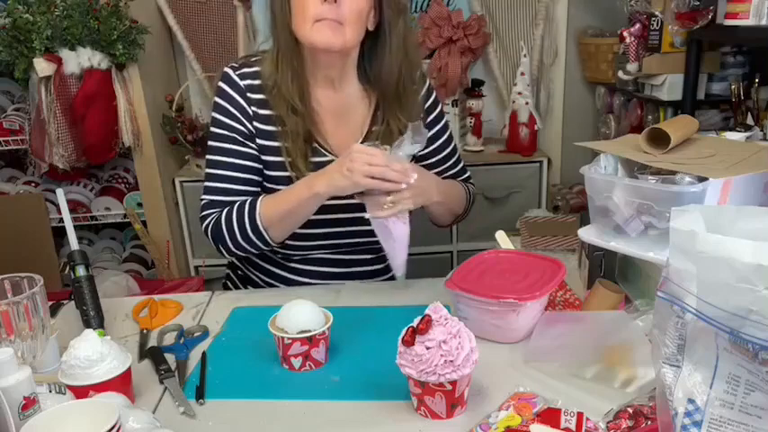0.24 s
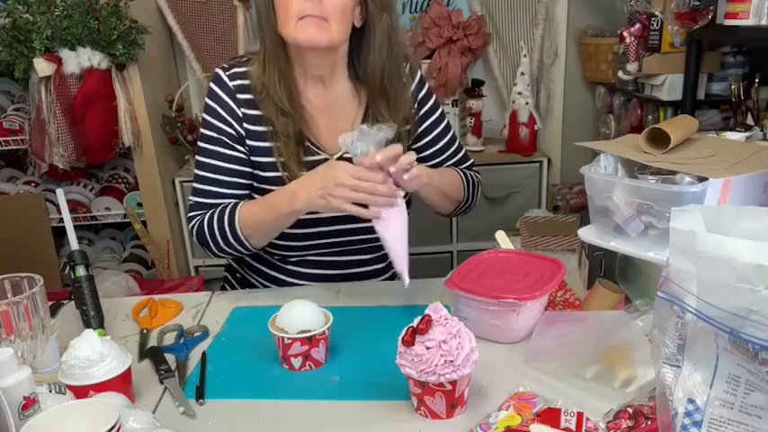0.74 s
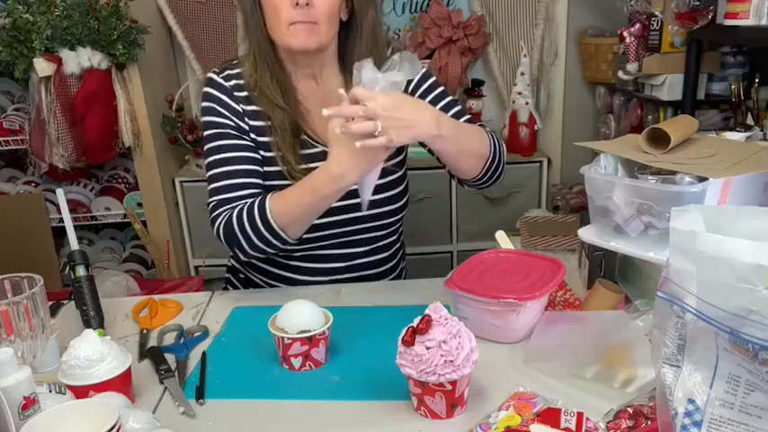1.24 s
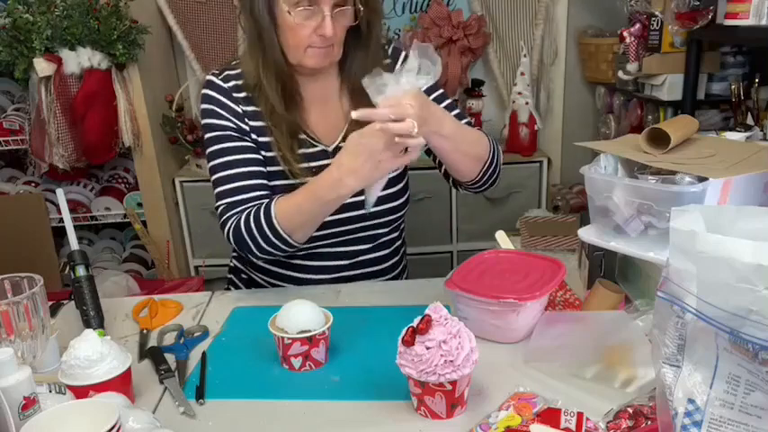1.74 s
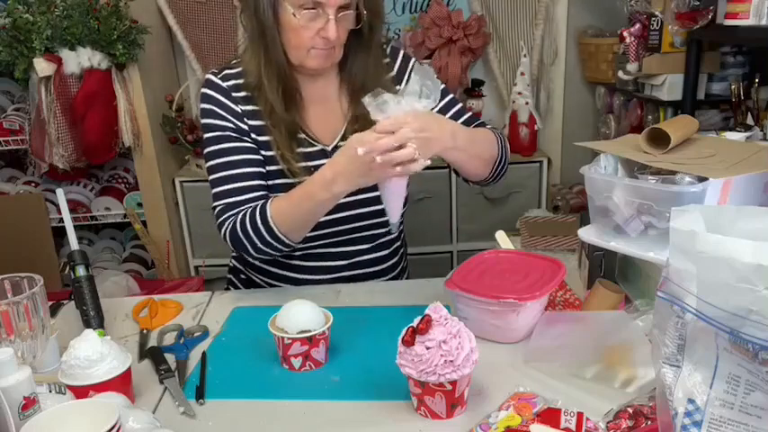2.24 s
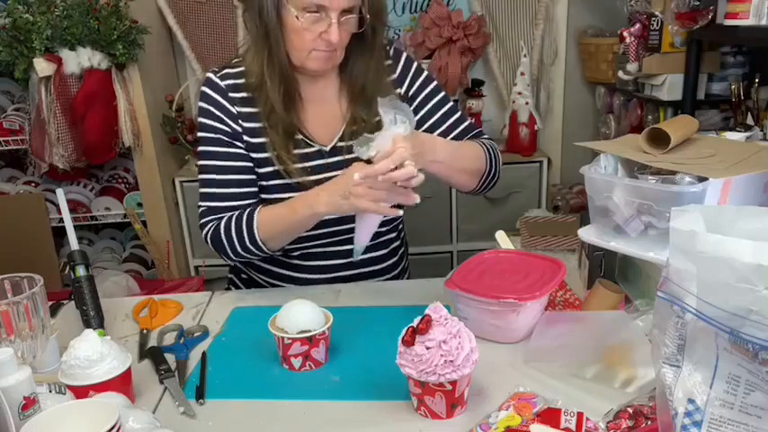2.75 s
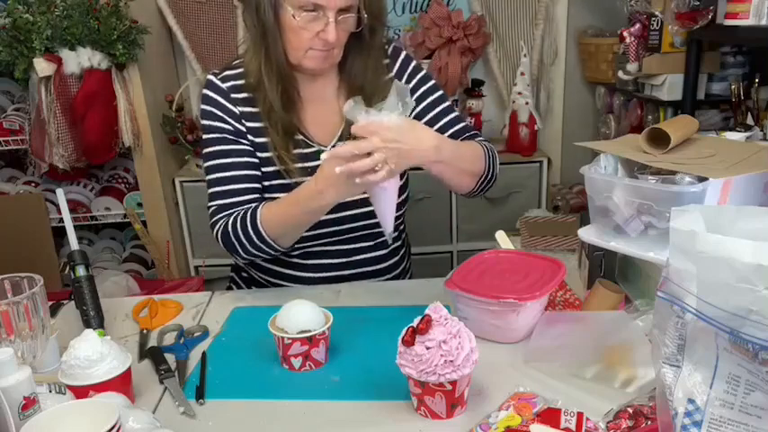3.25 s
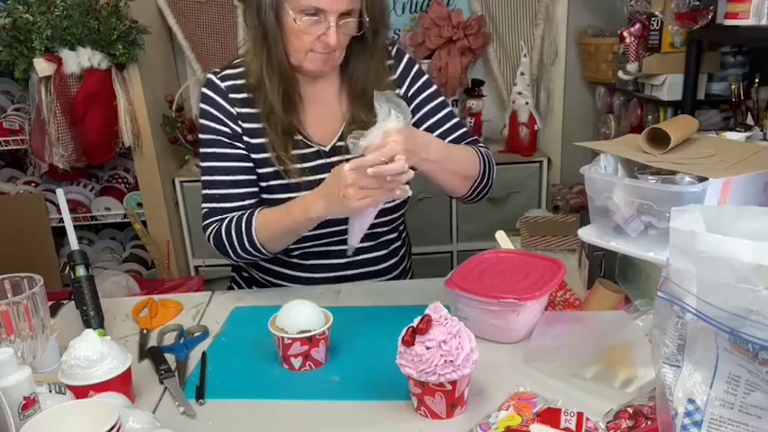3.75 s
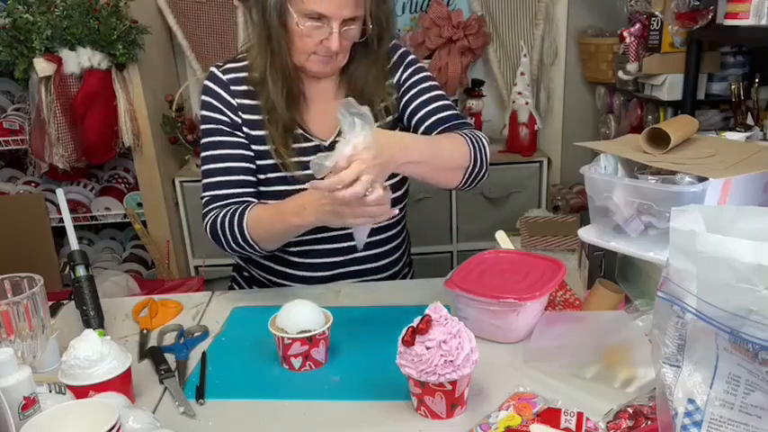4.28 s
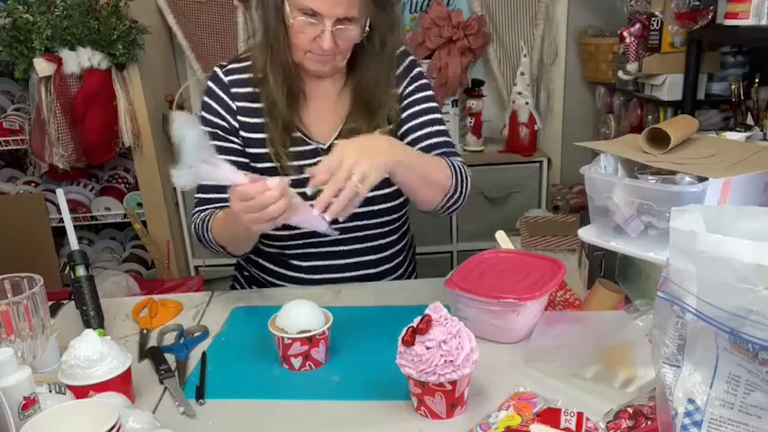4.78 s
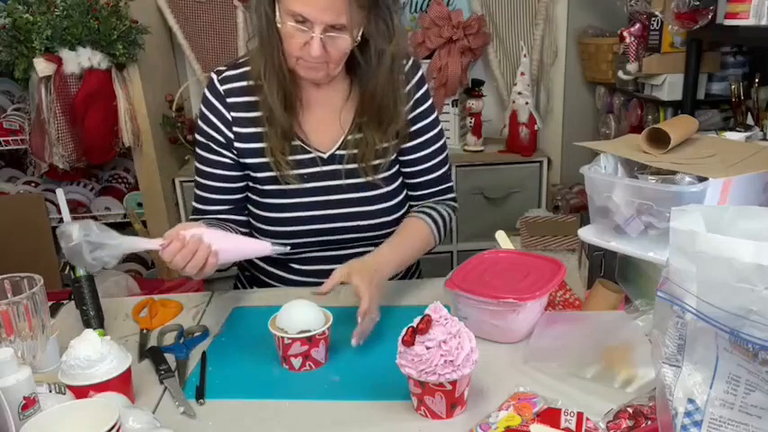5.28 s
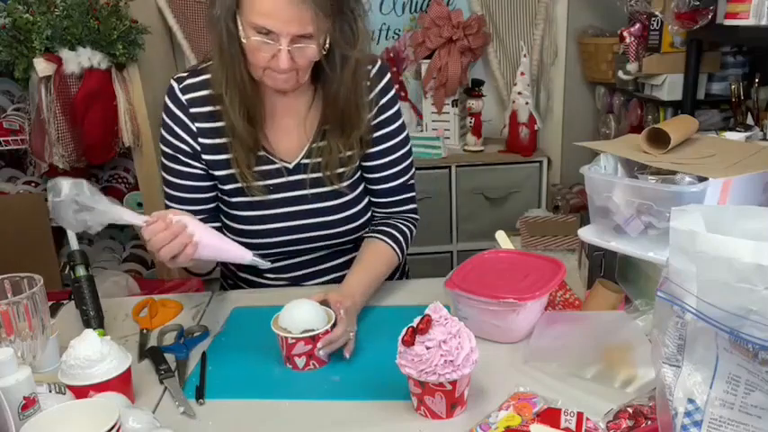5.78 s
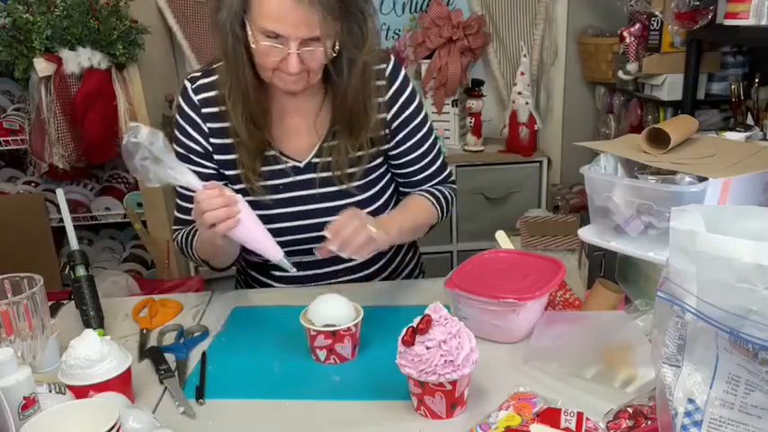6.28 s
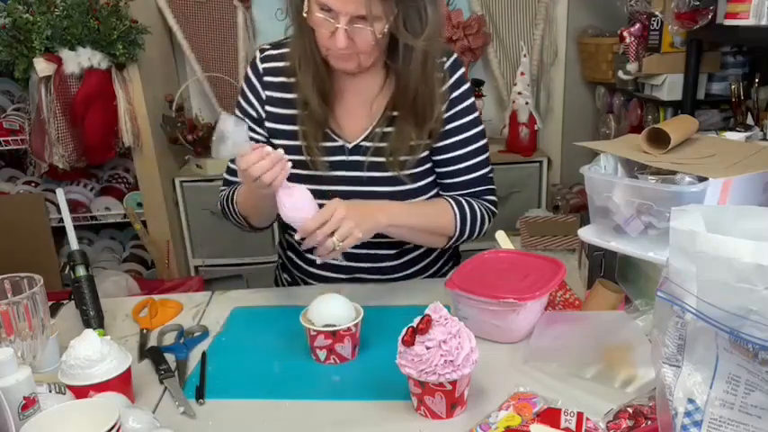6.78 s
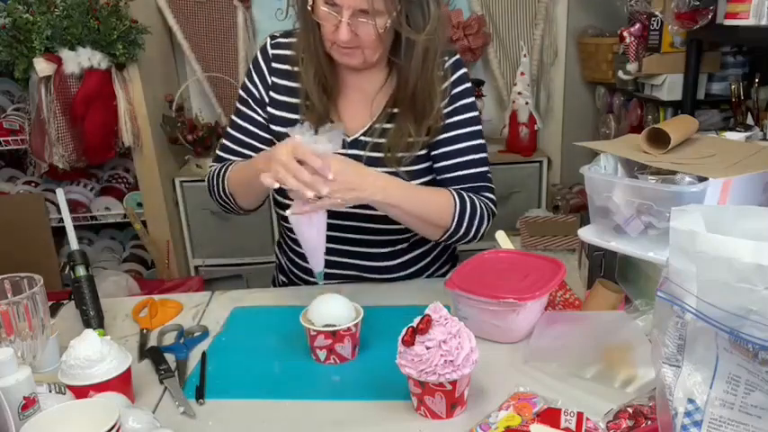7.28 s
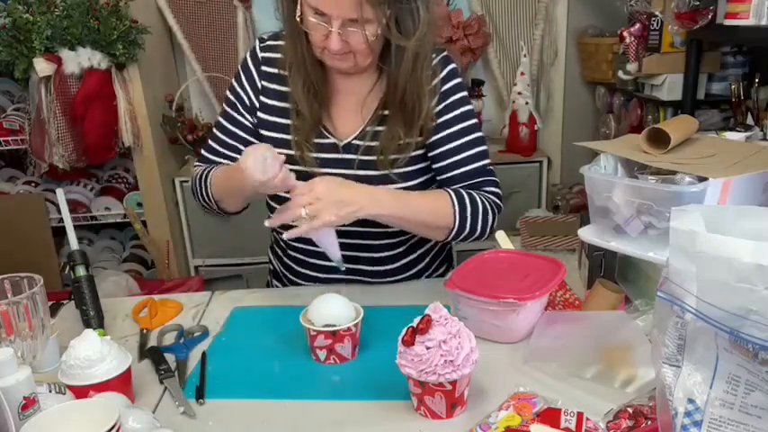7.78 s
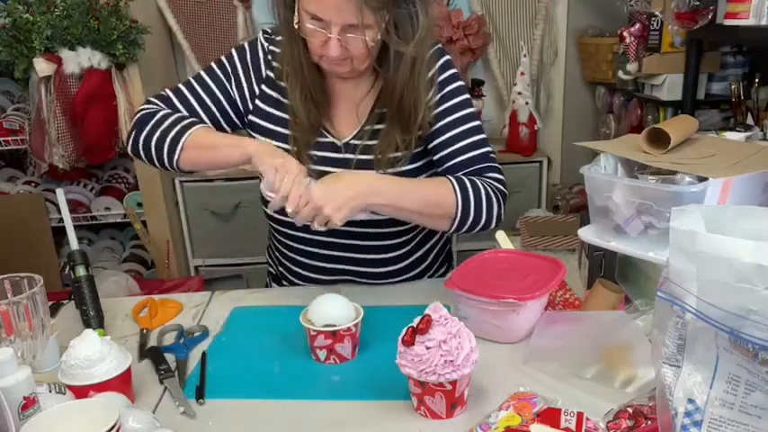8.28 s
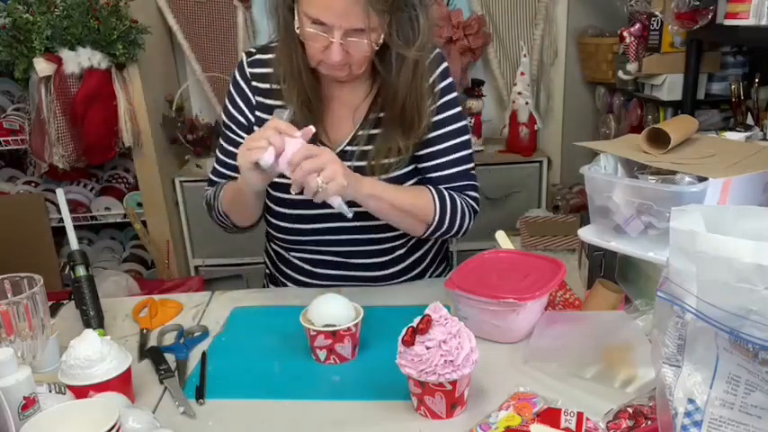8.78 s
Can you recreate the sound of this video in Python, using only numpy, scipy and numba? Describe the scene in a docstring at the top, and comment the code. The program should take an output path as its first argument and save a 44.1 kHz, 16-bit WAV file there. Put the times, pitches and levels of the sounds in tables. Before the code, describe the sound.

Close to one microphone in a small, dry, cluttered room, a thin plastic piping bag is twisted and squeezed. From 0 to 0.7 s it is loudest: sharp pops, dense swarms of bright snapping creases and several hollow knocks as large folds flip. From 0.8 to 3 s the crinkling comes in uneven, gradually weaker bursts with crisp single snaps; from 3 to 5 s it thins to lighter ticks, with a brief rustle near 4.7 s. Around 5 to 5.9 s only sparse faint clicks remain. At 5.9 to 6.2 s a paper cup slides roughly over a mat, then lands with a short rattling tap at 6.3 s. Light ticks return from 6.5 s, building to loud crackle and knocks at about 7.4 to 8.6 s, then easing slightly but still snapping to the end at 9 s. Low room rumble, faint hiss and a wavering two-tone motor hum sit underneath, the hum sinking away.

```python
"""A thin plastic piping bag is twisted and squeezed by hand in a small, cluttered craft room, near one microphone.
It opens with sharp pops, dense swarms of snapping creases and hollow knocks, and slowly calms over some five seconds.
Near 6 s a paper cup slides over a mat (rough noise through wall resonances) and is set down (a rattling ring);
then the bag builds up to loud crackle again. Noise bursts ringing small panels of film make the snaps.
Throughout, room rumble and hiss lie under a distant motor, two wavering tones that sink away towards the end."""
import sys
import numpy as np
from scipy import signal
from scipy.fft import rfft, irfft
from scipy.io import wavfile
from scipy.ndimage import uniform_filter1d
from numba import njit

SR = 44100
rng = np.random.default_rng(int(sys.argv[2]) if len(sys.argv) > 2 else 0)


def dump_mix(stems):
    """Bounce the given channels to the path in sys.argv[1] as a 16-bit WAV at rate SR."""
    frames = np.atleast_2d(stems).T  # one column per channel
    limited = np.clip(frames, -1, 1)  # hard clip at full scale
    pcm = np.round(limited * 32767).astype(np.int16)
    wavfile.write(sys.argv[1], SR, pcm)


N = 398223  # length in samples
STEP = 64  # gesture gains are worked out once every so many samples

# Tone of the room's rumble and hiss. Each row: frequency in Hz, density in dB per Hz (relative).
AIR_TONE = [(18, -70), (30, -44.5), (52, -12.5), (75, -6.5), (170, -9.5), (330, -11), (560, -19),
            (800, -21.5), (1300, -26.5), (2000, -35), (3500, -34), (7000, -38), (16000, -43.5)]
AIR_DB = -62
# Two lines of motor hum. Each row: time in s, lower line in dB, upper line in dB (both before HUM_TRIM_DB).
HUM_LEVELS = [(0.0, -57, -53), (1.5, -61, -59.5), (2.2, -54.5, -57), (2.59, -56.5, -57), (2.76, -64.5, -71),
              (4.6, -64, -63), (6.44, -67.5, -75.5), (9.03, -84, -94)]
# Centre frequencies of the lower and the upper hum line in Hz.
HUM_HZ = 72.2, 108.2
HUM_TRIM_DB, HUM_WAVER_DB = -5.0, 2.5
ROOM_T60_S, ROOM_DB = 0.13, -10  # decay below the treble; energy of the tail against the direct sound
TREBLE_T60_RATIO = 0.68

# Resonances of the sliding cup. Each row: centre in Hz, width in Hz, gain in dB (relative).
CUP_BODY = [(177, 93, -6), (366, 240, -7), (850, 160, 0.5), (1280, 860, -7.5), (2320, 620, -3.5),
            (3800, 1500, -6), (6300, 4900, -10.5)]
# Set-downs of the cup. Each row: start in s, peak in dB.
CUP_TAPS = [(6.331, -32.5)]
# Modes of the knocked cup. Each row: frequency in Hz, strength in dB (relative), 60 dB decay time in s.
CUP_MODES = [(440, 6, .05), (596, 3.5, 0.05), (786, 10, .04), (994, 8, 0.035), (1410, 4, 0.022),
             (2010, 1.5, 0.027), (2600, -2, 0.017)]
# Pushes of the cup over the mat. Each row: time of full level in s, hold in s, level in dB.
CUP_PUSHES = [(5.905, 0.018, -47), (5.964, .015, -47), (6.045, .16, -38.5)]
PUSH_RISE_DB_PER_S, PUSH_SAG_DB_PER_S, PUSH_STOP_DB_PER_S = 300, 47, 505

# Hollow knocks of the filled bag as a large fold flips. Each row: start in s, drive in dB, ring in Hz.
FOLD_FLIPS = [(0.052, -26, 570), (0.161, -26, 600), (0.187, -29, 606), (0.274, -21.5, 579),
              (0.409, -28.5, 570), (0.713, -37, 581), (1.128, -31, 545), (1.678, -36, 538),
              (2.689, -32, 579), (2.739, -31, 447), (7.463, -27, 498), (7.98, -31, 447), (8.156, -37, 560),
              (8.386, -27, 617), (8.464, -38, 603), (8.525, -31, 546), (8.572, -34.5, 536),
              (8.752, -33, 563)]
# Single snaps that stand out from the crackle, loud and soft. Each row: start in s, drive in dB (before trims),
# ring in Hz, treble in dB against the drive.
SINGLE_SNAPS = [(0.056, -3, 1600, -12.5), (0.087, -12, 1610, -22), (0.156, -17, 2150, -1),
                (0.187, -8.5, 1460, -10), (0.431, -13.5, 2830, -4), (0.551, -11.5, 1900, -9),
                (0.599, -11.5, 1670, -5.5), (0.645, -18, 2970, 3), (0.715, -28, 2500, -15),
                (0.738, -27, 2500, -15), (0.806, -16.5, 1860, -11), (0.863, -18, 4560, -15),
                (0.937, -20.5, 1700, -2), (0.965, -26, 3090, -17), (1.049, -21, 3730, -7),
                (1.086, -9.5, 2860, -15), (1.201, -17, 2780, -28), (1.381, -17.5, 2700, -33),
                (1.525, -17, 3000, -9), (1.636, -14.5, 1850, -16), (1.653, -11.5, 2380, -15),
                (1.677, -13.5, 1630, -5.5), (1.797, -13.5, 5950, -14), (1.891, -11.5, 3270, -16),
                (1.916, -13, 1060, -23), (2.123, -27, 4180, -15), (2.222, -19, 3080, -11),
                (2.243, -19.5, 4270, -29), (2.339, -21, 3220, -14), (2.405, -18.5, 3600, -3),
                (2.479, -18, 4270, -13), (2.493, -10.5, 4600, -10), (2.694, -14, 3030, -23),
                (2.739, -9.5, 3120, -17), (2.867, -9.5, 5200, -14), (3.013, -21.5, 3800, -13),
                (3.054, -22, 4770, -10), (3.089, -22, 2800, -24), (3.209, -26, 4700, -3.5),
                (3.34, -23, 3080, -24), (3.416, -22.5, 4630, -2.5), (3.514, -12, 4560, -8),
                (3.566, -12.5, 3580, -21), (3.871, -19.5, 2980, -0.5), (4.033, -17, 3800, -18),
                (4.086, -22, 5600, -20), (4.14, -27, 3020, -22), (4.221, -30.5, 3070, -18),
                (4.295, -21, 1600, -31), (4.317, -28, 1600, -20), (4.477, -33.5, 3340, -15),
                (4.624, -27, 2710, -17), (4.818, -25.5, 1370, -29), (5.186, -32.5, 3560, -35),
                (5.466, -20.5, 4000, -18.5), (5.495, -35.5, 1780, -30), (5.657, -42.5, 4090, -29),
                (5.758, -24.5, 3180, -22), (5.764, -27.5, 4970, -25), (6.26, -50, 3700, -23),
                (6.293, -44, 3380, -35), (6.487, -25, 1310, -18), (6.677, -29, 3330, -23),
                (6.743, -21, 3100, -12), (6.847, -20, 2920, -4), (6.888, -17, 5640, -12),
                (7.041, -29.5, 3320, -13), (7.2, -20.5, 2160, -16), (7.35, -22, 4110, -23),
                (7.401, -15, 3890, -24), (7.538, -5, 4700, -17), (7.608, -13.5, 4740, -11),
                (7.944, -9.5, 6850, -16), (8.017, -10.5, 3420, -24), (8.112, -20, 2070, -20),
                (8.137, -13.5, 3100, -4), (8.373, -13, 2400, -15), (8.471, -19.5, 2030, -17),
                (8.523, -14.5, 4530, -14), (8.573, -13, 2540, -16), (8.656, -19, 3360, -10),
                (8.753, -12, 2100, -22), (8.789, -19, 3000, -10), (8.855, -14.5, 3380, -12.5),
                (8.901, -20.5, 4400, -13), (8.938, -19.5, 5300, -11), (8.977, -18, 6630, -5.5)]
# Tone of the crackling film. Each row: frequency in Hz, density in dB per Hz (relative).
FILM_TONE = [(88, -52.5), (150, -20.5), (291, -16), (578, -9), (805, -13), (1170, -3), (1600, -2.5),
             (2450, 1), (4580, 1), (13400, -12.5), (16000, -16)]
# Twists and squeezes. Each row: time of full grip in s, hold in s, crackle in dB (before CRACKLE_TRIM_DB),
# large folds in dB against the crackle.
GRIPS = [(0.0, 0.097, -33.5, -4), (0.152, 0.069, -32.5, -2.5), (0.256, 0.065, -25, -7),
         (0.429, 0.041, -26.5, -5.5), (0.512, 0.15, -31.5, -8), (0.809, 0.16, -44.5, -10),
         (1.039, 0.11, -37, -3.5), (1.208, 0.39, -39, -9), (1.643, 0.045, -34.5, -7),
         (1.72, 0.11, -40, -13), (1.901, 0.084, -31.5, -10.5), (2.158, 0.11, -47.5, -5.5),
         (2.367, 0.064, -39, -10), (2.502, .2, -37.5, -8), (2.711, 0.14, -36.5, -10),
         (3.02, .36, -49.5, -14), (3.434, .05, -40.5, -13), (3.504, 0.063, -38, -12),
         (3.63, 0.19, -50.5, -7), (3.828, 0.038, -45.5, -5.5), (4.055, .13, -54, -12.5),
         (4.204, .14, -50, -12), (4.41, .08, -58.5, -18), (4.639, .03, -43, -10),
         (4.683, 0.018, -35.5, -6.5), (4.828, 0.019, -64, -11), (5.186, 0.031, -70.5, -1),
         (5.498, 0.052, -68, -9), (5.644, 0.038, -63.5, -8), (5.762, .06, -64.5, -2),
         (6.261, 0.13, -67.5, 4.5), (6.477, 0.118, -65.5, -1), (6.703, 0.09, -57.5, -3),
         (6.841, .05, -43.5, -8.5), (6.943, .22, -56.5, -7.5), (7.204, .14, -49.5, -10.5),
         (7.377, 0.059, -41, -8.5), (7.44, 0.028, -29, -11), (7.501, .11, -34, -12),
         (7.679, 0.07, -39, -18), (7.83, 0.21, -34, -14), (8.152, 0.047, -30, -12),
         (8.259, 0.14, -39, -8.5), (8.443, 0.23, -48, -9), (8.739, .05, -47.5, -7),
         (8.819, .21, -46.5, -16)]
CRACKLE_TRIM_DB = 1.0
RISE_DB_PER_S, FALL_DB_PER_S = 317.5, 239.5  # how fast a grip tightens and lets go
REST_DB, REST_FOLDS_DB = -86, -3  # the film barely creeps between grips
# fine creases fall silent under a light touch
FINE_DB, SOFT_BELOW_DB, DULL_DB_PER_DB = -2.5, -53.5, 0.5
TOP_HZ = 15850  # upper edge of the sound


def undb(db):
    """Decibels to gain."""
    return 10 ** (np.asarray(db) / 20)


def level(x, db):
    """Scale x to an RMS level in dB."""
    return x * undb(db) / np.sqrt(np.mean(x ** 2))


def curves(table):
    """Columns of a table joined by straight lines, one value a sample."""
    s, *columns = np.transpose(table)
    return [np.interp(np.arange(N) / SR, s, c) for c in columns]


def colour(x, points):
    """Shape the spectrum by (Hz, dB) points, joined over log frequency."""
    hz, db = np.transpose(points)
    f = np.maximum(np.arange(N // 2 + 1) * SR / N, 1)
    return irfft(rfft(x) * undb(np.interp(np.log(f), np.log(hz), db)), N)


def band(x, hz, width):
    """Resonance with gain 1 at its centre."""
    return signal.lfilter(*signal.iirpeak(hz, hz / width, SR), x)


def cut_below(x, order, hz):
    """High-pass filter."""
    return signal.sosfilt(signal.butter(order, hz, "high", fs=SR, output="sos"), x)


def shelves(x):
    """Bass, middle and treble parts that sum to x."""
    low = signal.sosfiltfilt(signal.butter(2, 1000, fs=SR, output="sos"), x)
    high = signal.sosfiltfilt(signal.butter(2, 7500, "high", fs=SR, output="sos"), x)
    return low, x - low - high, high


def gestures(start, hold, db, rise, fall, sag=0.):
    """Gain of each gesture, one row each: a rise to the start, a sagging hold, a fall; slopes in dB per s."""
    t = np.arange(0, N, STEP) / SR - np.array(start)[:, None]
    hold = np.array(hold)[:, None]
    slope_db = rise * np.minimum(t, 0) - sag * np.clip(t, 0, hold) - fall * np.maximum(t - hold, 0)
    return undb(np.array(db)[:, None] + slope_db)


def per_sample(x):
    """Stretch a gesture curve to one value a sample."""
    return np.repeat(x, STEP)[:N]


@njit
def bursts(noise, start, size, hz, tau, rise, q, broad):
    """Each buckle is a quick swell and decay of noise; part of it rings the small panel around the crease."""
    out = np.zeros(len(noise))
    for e in range(len(start)):
        # state-variable band-pass, tuned to the panel
        g, k = np.tan(np.pi * hz[e] / SR), 1 / q
        band_state, low_state = 0., 0.
        fall, fast = np.exp(-1 / (tau[e] * SR)), np.exp(-1 / (rise * SR))
        # the envelope is a slow decay minus a fast one
        slow_env, fast_env = size[e], size[e]
        for i in range(start[e], min(start[e] + int(7 * tau[e] * SR) + 100, len(noise))):
            x = (slow_env - fast_env) * noise[(i + 997 * e) % len(noise)]
            v = (band_state + g * (x - low_state)) / (1 + g * (g + k))
            band_state, low_state = 2 * v - band_state, low_state + 2 * g * v
            slow_env, fast_env = slow_env * fall, fast_env * fast
            out[i] += broad * x + v * np.sqrt(k / g)
    return out


def background():
    """Rumble and hiss of the room as coloured noise, and two motor lines that waver in pitch and level."""
    t = np.arange(N) / SR
    drift = np.cumsum(rng.standard_normal((2, N)), axis=1) * 0.011  # phase wander in radians
    waver_db = HUM_WAVER_DB * level(uniform_filter1d(rng.standard_normal(N), SR // 8), 0)
    hum = 0
    for db, hz, wander in zip(curves(HUM_LEVELS), HUM_HZ, drift):
        gain = np.sqrt(2) * undb(db + HUM_TRIM_DB + waver_db)
        hum = hum + gain * np.sin(2 * np.pi * hz * t + wander)
    return hum + level(colour(rng.standard_normal(N), AIR_TONE), AIR_DB)


def room(near, count=8):
    """Table and shelves send back a short dense tail; the hands keep moving, so its pattern keeps changing."""
    t, out = np.arange(SR // 3) / SR, 0
    place = np.repeat(rng.integers(0, count, N // 1500 + 1), 1500)[:N]
    gap = np.zeros(int(.003 * SR))
    for k in range(count):
        low, mid, high = shelves(rng.standard_normal(len(t)))
        tail = (low + mid) * 1000 ** (-t / ROOM_T60_S) + high * 1000 ** (-t / (TREBLE_T60_RATIO * ROOM_T60_S))
        tail = np.concatenate([gap, undb(ROOM_DB) * tail / np.sqrt(np.sum(tail ** 2))])
        here = uniform_filter1d(1. * (place == k), 200)  # soft switch between places
        out = out + signal.oaconvolve(near * here, tail)[:N]
    return out


def cup_slide():
    """Rough friction of the rim on the mat rings the paper wall."""
    pushes = gestures(*np.transpose(CUP_PUSHES), PUSH_RISE_DB_PER_S, PUSH_STOP_DB_PER_S, PUSH_SAG_DB_PER_S)
    push = uniform_filter1d(per_sample(np.sqrt(np.sum(pushes ** 2, axis=0))), STEP)
    grit = rng.standard_normal(N) * undb(20 * uniform_filter1d(rng.standard_normal(N), 60))
    # the soft mat dulls the finest grit
    dull = signal.sosfilt(signal.butter(4, 7500, fs=SR, output="sos"), grit)
    grit = undb(-17.5) * grit + dull
    wall = sum(undb(db) * band(grit, hz, width) for hz, width, db in CUP_BODY)
    return push * level(wall, 0)


def cup_taps():
    """The cup knocks down unevenly: a rattling blow excites the decaying modes of its wall."""
    out, t = np.zeros(N), np.arange(SR // 4) / SR
    ring = 0
    for k, (hz, db, t60) in enumerate(CUP_MODES):
        ring = ring + undb(db) * (-1) ** k * np.sin(2 * np.pi * hz * t) * 1000 ** (-t / t60)
    # the rim does not land at once: the blow is a rattle of a few ms
    rattle = rng.standard_normal(len(t)) * np.exp(-t / 0.0094) * (1 - np.exp(-t / 0.0014))
    ring = signal.fftconvolve(ring, rattle)[:len(t)]
    ring = cut_below(ring, 2, 300)  # a light cup has no bass
    for s, peak_db in CUP_TAPS:
        out[int(s * SR):int(s * SR) + len(t)] += ring * undb(peak_db) / abs(ring).max()
    return out


def flips(tau_s=0.0056, rise_s=0.0011, q=4.0):
    """A large fold flips over and the air in the bag gives a short hollow knock."""
    s, db, hz = np.transpose(FOLD_FLIPS)
    start, tau = (s * SR).astype(np.int64), tau_s + 0 * s
    return bursts(rng.standard_normal(N), start, undb(db), np.clip(hz, 300, 900), tau, rise_s, q, 0.)


def handling():
    """Crackle level, share of large folds and share of fine creases, in dB, from all grips together."""
    start, hold, db, folds_db = np.transpose(GRIPS)
    power = gestures(start, hold, db, RISE_DB_PER_S, FALL_DB_PER_S) ** 2
    total = power.sum(axis=0) + undb(REST_DB) ** 2
    folds = undb(folds_db) ** 2 @ power + undb(REST_DB + REST_FOLDS_DB) ** 2
    db = uniform_filter1d(per_sample(10 * np.log10(total)), STEP)
    folds_db = per_sample(10 * np.log10(folds / total))
    fine_db = FINE_DB + DULL_DB_PER_DB * np.minimum(db - SOFT_BELOW_DB, 0)
    return db, folds_db, fine_db


def pops(folds_db, tau_s=.0019, rise_s=.0003):
    """Single snaps, loud and soft: a ring, a treble crack and a thump that grows where large folds move."""
    s, db, hz, treble_db = np.transpose(SINGLE_SNAPS)
    # the crease gives way in steps: a weak tick leads each snap, two follow it
    chance = rng.random((len(s), 6)).T
    lead_s = s - .003 - 0.0031 * chance[0]
    second_s, third_s = s + .003 + .008 * chance[1], s + 0.0075 + 0.0084 * chance[2]
    s = np.concatenate([s, lead_s, second_s, third_s])
    lead_db = db - 18.0 - 12 * chance[3]
    second_db, third_db = db - 7.5 - 9 * chance[4], db - 11.0 - 11 * chance[5]
    db = np.concatenate([db, lead_db, second_db, third_db])
    hz = np.concatenate([hz, 0.35 * hz, .8 * hz, 0.85 * hz])
    treble_db = np.tile(treble_db, 4)

    start, one = np.clip(s * SR, 0, N - 1).astype(np.int64), np.ones(len(s))
    ring_size, crack_size = undb(db - 4.5), undb(db + treble_db + 0.5)
    thump_size = undb(db + folds_db[start] - 15.0)
    ring_hz = np.clip(hz, 300, 9000)
    ring = bursts(rng.standard_normal(N), start, ring_size, ring_hz, tau_s * one, rise_s, 3.2, 1.0)
    crack = bursts(rng.standard_normal(N), start, crack_size, 10000 * one, 1.92 * tau_s * one, rise_s, 0.99, 0.26)
    thump = bursts(rng.standard_normal(N), start, thump_size, 540 * one, 0.98 * tau_s * one, rise_s, 2.1, 0.)
    return shelves(ring)[1] + shelves(crack)[2] + thump


def crackle(db, folds_db, fine_db, rate=1500, spread_db=4.0, tau_s=0.0012, swarm_db=2.5):
    """Small creases snap at random, in swarms: dense and even under hard work, sparse and uneven under light."""
    count = int(rate * N / SR)  # rate in snaps per second
    when, loud, pitch, length, keep = rng.random((count, 5)).T
    start = (when * (N - 1)).astype(np.int64)
    effort = np.clip((db[start] + 56.5) / 28, .12, 1)
    # one buckle releases its neighbours: bunches of some 12 ms that share strength and panel size
    bunch = rng.standard_normal((2, N // 500 + 1))
    strength = uniform_filter1d(np.repeat(bunch[0], 500), 300)[start]
    hz = np.clip(1600 * 4 ** pitch * 1.403 ** bunch[1, start // 500], 900, 12000)
    size_db = -spread_db * np.log(1 - .985 * loud) + swarm_db * strength
    size = undb((1.19 - 0.66 * effort) * size_db)
    # light work leaves most snaps weak
    size = size * np.where(keep < effort, 1, undb(-10.0)) / np.sqrt(effort)
    snaps = bursts(rng.standard_normal(N), start, size, hz, tau_s * 3 ** length, 0.00026, 1.43, 0.78)
    snaps = colour(snaps, FILM_TONE)
    # even out the slow swings, so that the grips set the level
    snaps = snaps / (uniform_filter1d(snaps ** 2, int(.1 * SR)) + 1e-9) ** 0.46
    low, mid, high = (level(part, 0) for part in shelves(snaps))
    return undb(db + CRACKLE_TRIM_DB) * (mid + undb(folds_db) * low + undb(fine_db) * high)


def scene():
    """Bag and cup close by, their tail from the room, and the background."""
    db, folds_db, fine_db = handling()
    bag = crackle(db, folds_db, fine_db) + pops(folds_db) + flips()
    near = bag + cup_slide() + cup_taps()
    return (near + room(near) + background())[None]


def record(dry):
    """A steep low-pass cuts the top."""
    return signal.sosfilt(signal.ellip(10, .5, 75, TOP_HZ, fs=SR, output="sos"), dry)


dry = scene()
out = record(dry)
dump_mix(out)
```